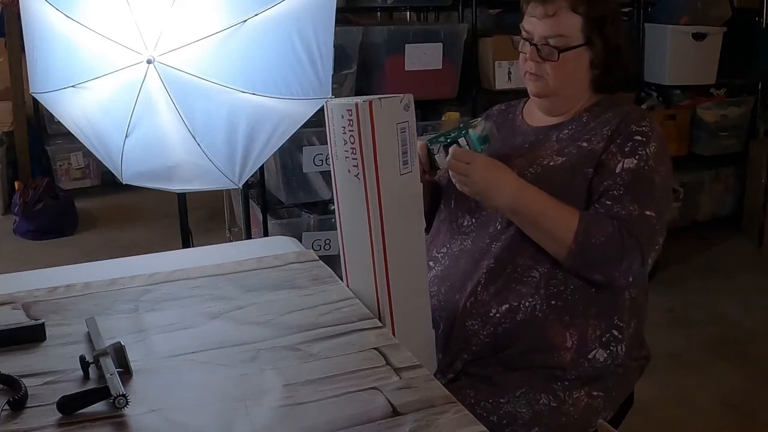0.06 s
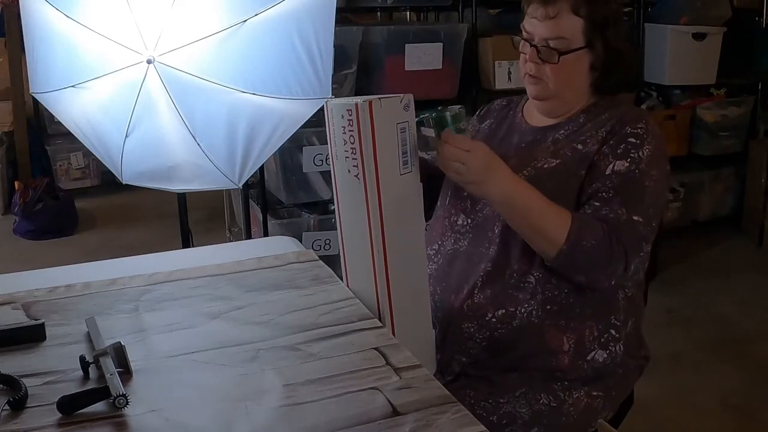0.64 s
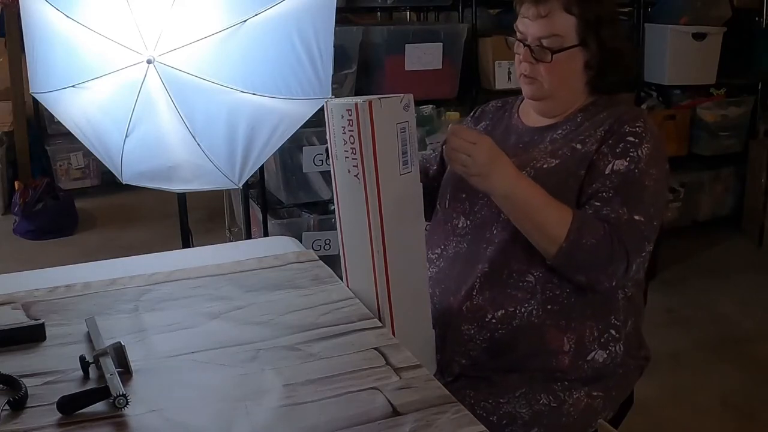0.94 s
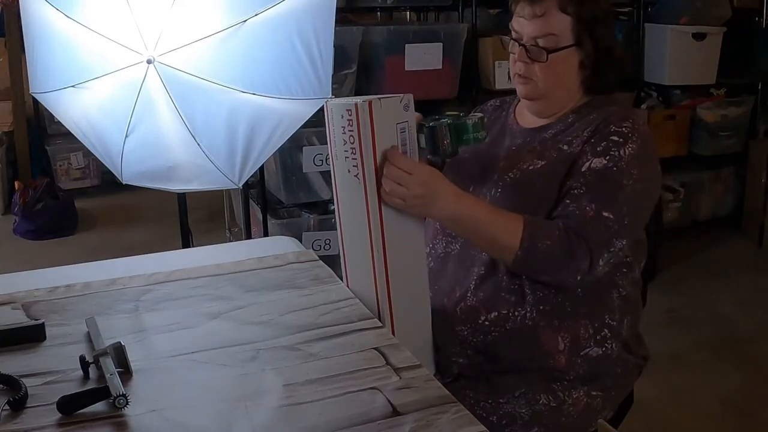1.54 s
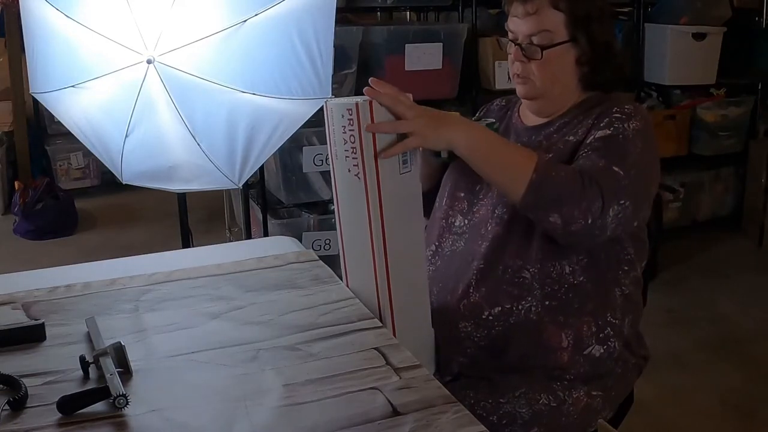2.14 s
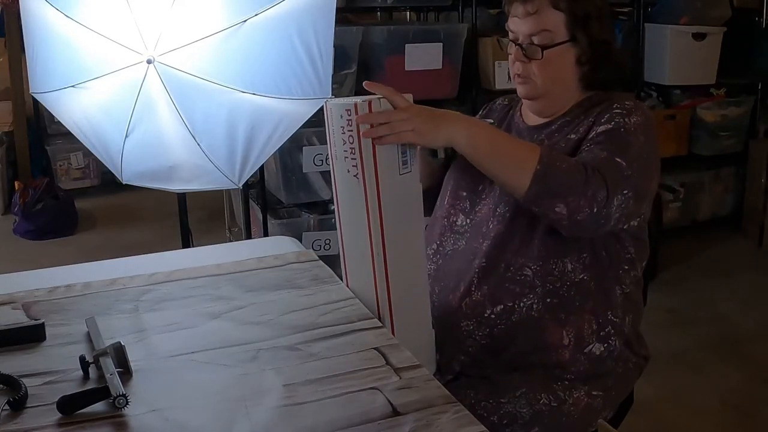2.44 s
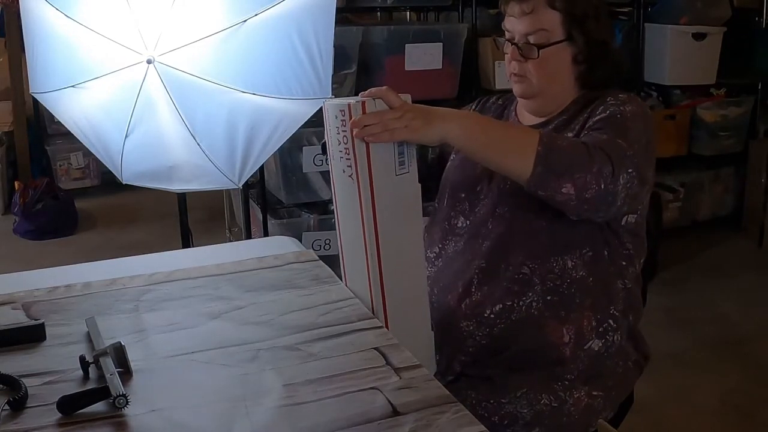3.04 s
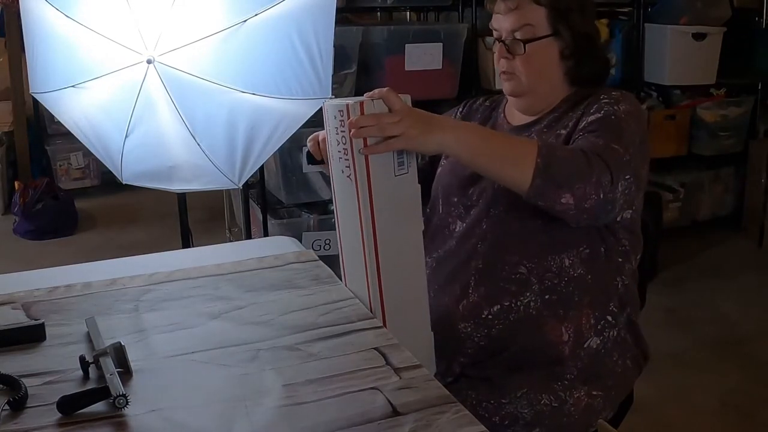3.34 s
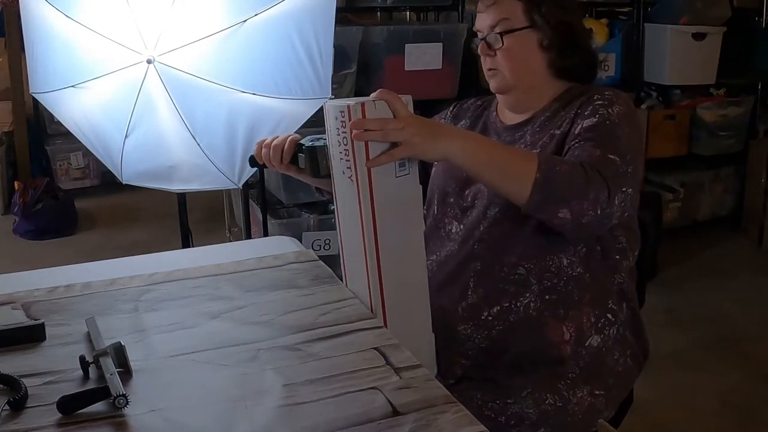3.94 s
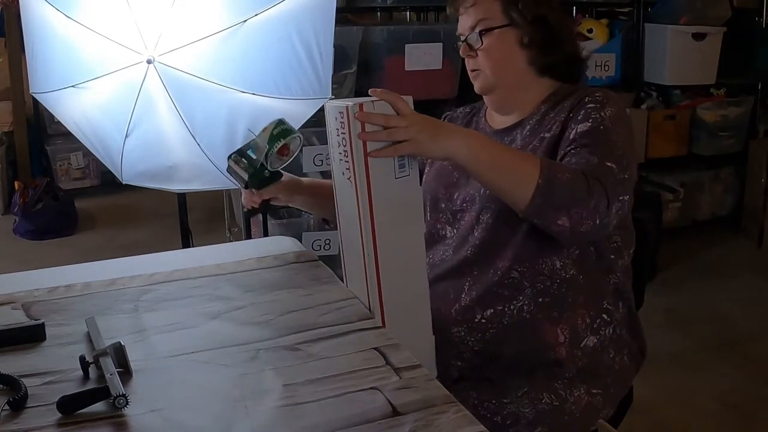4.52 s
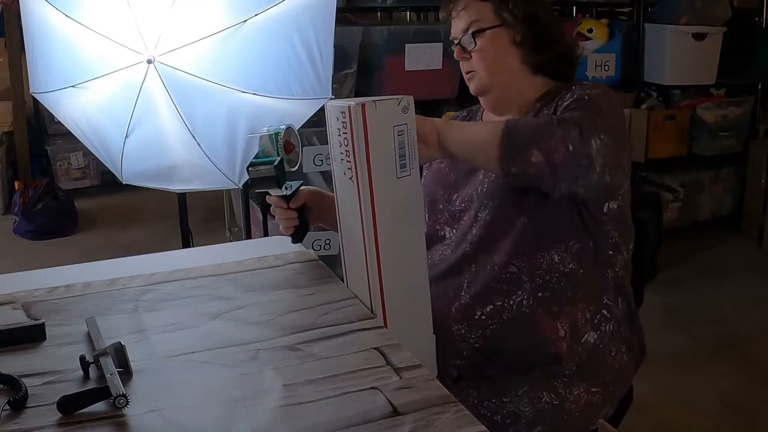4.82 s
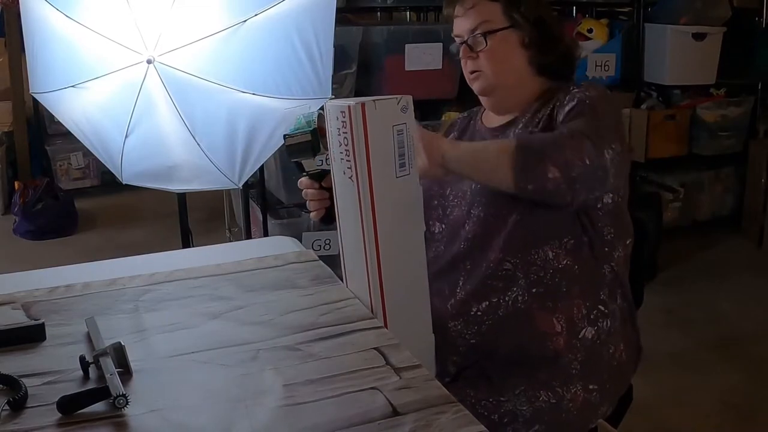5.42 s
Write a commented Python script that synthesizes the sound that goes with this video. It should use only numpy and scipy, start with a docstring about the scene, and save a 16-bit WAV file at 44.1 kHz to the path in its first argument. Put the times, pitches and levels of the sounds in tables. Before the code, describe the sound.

Packing tape jerks off a hand-held gun right at the start, with a tiny rip and then a longer stuttering rasp ending near 0.45 seconds. A faint metallic ring lingers until about 1.2 seconds. From 1.5 to 3.3 seconds a hand softly rubs tape and cardboard, with light bumps and small clicks, and a faint squeak and sharper click near 2.4 seconds. Two more short, loud pulls rasp at 3.4 and 3.9 seconds. Around 4.2 seconds the film snaps sharply on the blade and tears off with a brief crackle. The hollow box knocks and booms between 4.4 and 4.8 seconds, with clicks, a quick scuff and little squeaks on the tape. Soft rubbing continues to about 5.5 seconds. Everything sounds fairly close, in stereo, in a small room with short reflections and a faint low fan drone underneath.

```python
"""Packing tape rasps off a hand-held gun onto a tall cardboard box in a small store room.
Each short pull is a run of stick-slip jerks: the glue cracks loose and the taut film rings.
The blade tears the tape off with sharp snaps and a crackle. In between, metal rings faintly, a hand
rubs and squeaks over the tape, film and gun click, and bumps make the hollow box knock and boom.
A fan drones underneath."""
import sys
import numpy as np
from scipy import signal
from scipy.fft import rfft, irfft, next_fast_len
from scipy.io import wavfile

SR = 44100
rng = np.random.default_rng(int(sys.argv[2]) if len(sys.argv) > 2 else 0)


def to_wav(s):
    """Save 16-bit WAV."""
    ch = np.atleast_2d(s).T  # columns
    pcm = np.round(np.clip(ch, -1, 1) * 32767)  # PCM
    wavfile.write(sys.argv[1], SR, pcm.astype(np.int16))


N = 245989

# Levels in the tables are faders within a layer; the functions add each layer's trim.
# runs of tape jerks, five pulls and then the sharp snaps as the blade starts tearing the film:
#   (first jerk [s], second jerk [s], last jerk [s], jerks [count], slowing [0-1],
#   first jerk [dB], middle jerks [dB], last jerk [dB], fizz against a jerk [dB], bass [dB],
#   treble [dB], ring aimed at first [Hz], ring aimed at last [Hz], tug on the box [dB])
JERK_RUNS = [(.1529, .158, .165, 3, 0, -21, -16, -24.5, -13, -2, 11.5, 4500, 5100, -75),
             (.2887, .3115, .4315, 10, .45, -14.5, -18.3, -25.5, -13.5, 3, 3, 3900, 3600, -66),
             (3.4043, 3.4355, 3.5385, 10, 0, -15, -17.3, -17, -11, -3, .5, 3000, 5000, -35),
             (3.8581, 3.873, 3.9415, 5, .15, -18.5, -16.5, -17, -9.5, -2, 4, 4800, 4000, -40),
             (4.199, 4.2045, 4.214, 3, 0, -22, -15, -14, -15, -7, 2, 4300, 4850, -46),
             (4.262, 4.2675, 4.2815, 3, 0, -29, -19, -21, -12, -3, -9, 3300, 3600, -38)]
# tone of the cracking film: (frequency [Hz], level [dB])
FILM_COLOUR = [(71, -40), (120, -24), (261, -22.5), (370, -7.5), (436, -11.5), (473, -9), (727, -13.5),
               (1860, -1.5), (2240, -1.5), (3660, -3.5), (4060, -5), (4780, -1.5), (5300, -5.5),
               (12000, -26), (16000, -43.5)]
# resonances of film and gun: (frequency [Hz])
FILM_RINGS_HZ = [2320, 3100, 3770, 4750]
# tone of the tearing film: (frequency [Hz], level [dB])
TEAR_COLOUR = [(180, -56.5), (300, -26), (532, 2), (714, -8.5), (1190, 5.5), (1520, -7.5), (2480, 3),
               (3270, -0.5), (3610, -15.5), (4390, -17), (4850, -5.5), (5710, -14.5), (7920, -15),
               (12100, -26.5), (15000, -59)]
# ring of the blade and its plate: (frequency [Hz], t60 [s], level against the tearing [dB])
BLADE_MODES = [(1195, .17, -5), (2550, .05, -10), (3640, .08, -5)]
# metal that sings along: (frequency [Hz], level [dB], t60 [s])
METAL_MODES = [(811, -64.5, 0.92), (1800, -80.5, 1.6), (1810, -78.5, 1.8), (3380, -74.5, 0.99)]
# snaps of film and gun: (time [s], level [dB], bass [dB], treble [dB], ring [Hz])
CLICKS = [(.046, -44, -4.5, -9.5, 4190), (0.1046, -43, -.5, 6.5, 5240), (.111, -45, 0.5, 2, 1900),
          (0.148, -38.5, -11.5, 4, 4863), (1.3622, -57, -4, 17, 5790), (1.558, -36, -3.5, 6.5, 3260),
          (1.566, -43.5, -8.5, -2, 3150), (1.7203, -30, 11.5, 11, 6030), (1.754, -37.5, 8, 6.5, 6500),
          (2.139, -54.5, -6.5, -7, 5600), (2.4163, -29.5, -0.5, 6, 1950), (2.4179, -24.5, -3.5, -14, 3830),
          (2.898, -54, -2, -1, 2750), (3.0829, -42.5, 17, -14, 1030), (3.391, -42, -13, -4, 2200),
          (3.78, -39, -13, -5, 4070), (3.8072, -41.5, 1, 11.5, 2140), (3.8423, -42.5, 4.5, 6, 3200),
          (4.1629, -26.5, -6, 10.5, 5160), (4.1647, -30, -17, -9, 2000), (4.181, -26, -4.5, 9, 5000),
          (4.1876, -33, -4.5, 9.5, 4800), (4.381, -33.5, 11, -8, 3500), (4.403, -31, 20.5, -11, 1930),
          (4.4663, -32.5, -20.5, -5, 2950), (4.5016, -37, 30, -25, 3040), (4.593, -38.5, 25, -25, 1790),
          (4.604, -31.5, 3.5, 0, 2820), (5.023, -55.5, -15.5, 13, 2140)]
# bumps on the box: (time [s], panel knock [dB], hollow boom [dB])
BUMPS = [(1.603, -61.5, -57), (1.724, -51.5, -48.5), (1.758, -56, -46), (3.084, -54.5, -66),
         (3.462, -55, -37.5), (3.61, -59, -55), (4.015, -53.5, -42.5), (4.226, -42, -39.5),
         (4.2619, -43, -45.5), (4.401, -36.5, -61), (4.429, -56, -41.5), (4.503, -53, -31.5),
         (4.522, -44.5, -34.5), (4.593, -45.5, -48), (4.746, -51, -42), (4.845, -68, -49.5)]
# knock of the stiff cardboard panels: (frequency [Hz], level [dB], t60 [s])
PANEL_MODES = [(264, 0, 0.081), (366, 1.5, 0.16), (363, 7.5, 0.027), (454, 0.5, 0.073), (507, 6.5, 0.009),
               (650, -0.5, 0.055), (743, -6.5, 0.22), (1000, 6.5, 0.014), (1146, 1.5, 0.11),
               (1334, -3, 0.17)]
# boom of the air and big faces of the box: (frequency [Hz], level [dB], t60 [s])
HOLLOW_MODES = [(46.4, -5, 0.6), (91.7, -3, 0.38), (128.9, -2, 0.3), (157.6, -5.5, 0.17),
                (211.5, -3, 0.078)]
# hand strokes: (full pressure [s], hold [s], attack [dB/s], cardboard rub [dB], film hiss [dB])
STROKES = [(.01, 0.059, 300, -67.5, -60), (.62, 0.15, 100, -74, -72.5), (0.881, .04, 60, -77, -69),
           (1.558, 0.016, 399.5, -69.5, -51), (1.71, 0.041, 250, -58.5, -52.5),
           (2.09, 0.023, 600, -56, -59), (2.38, 0.053, 104, -55.5, -51.5), (2.492, 0.045, 200, -72, -58.5),
           (2.688, 0.024, 98, -64.5, -65.5), (2.94, 0.1, 115, -64, -64.5), (3.092, 0.11, 697, -52.5, -61),
           (3.154, 0.0091, 1200, -56, -47), (3.22, 0.36, 98.5, -52, -58), (3.7, 0.67, 99.5, -65.5, -67.5),
           (4.516, 0.002, 1100, -31.5, -40.5), (4.685, .03, 200, -76, -51.5),
           (4.749, 0.017, 250, -62, -43.5), (5.024, 0.037, 400, -75, -63), (5.186, 0.019, 99, -57.5, -56.5),
           (5.322, 0.21, 195.5, -61.5, -65)]
# tone of skin on cardboard: (frequency [Hz], level [dB])
RUB_COLOUR = [(210, -41.5), (350, -4.5), (495, -15.5), (791, -12.5), (1180, -2), (1550, -7), (1940, -3.5),
              (2310, -14), (3580, -13.5), (4000, -15.5), (5200, -53.5), (8800, -120)]
# tone of skin on film: (frequency [Hz], level [dB])
HISS_COLOUR = [(1500, -27.5), (2100, 4.5), (2600, 2.5), (3500, 5), (6500, -3), (9000, -11), (13000, -18.5),
               (16000, -41)]
# narrow singing tones, a faint metal ring after the first pulls and then short squeaks on the film:
#   (time [s], length [s], level [dB], pitch [Hz])
SINGING_TONES = [(0.549, 0.66, -73.5, 1792), (2.328, 0.082, -56, 2040), (4.642, 0.017, -53.5, 2010),
                 (4.712, 0.08, -52, 1900)]
# reverb decay: (frequency [Hz], t60 [s])
ROOM_T60 = [(100, 1), (400, 0.24), (1000, .37), (2500, 0.33), (5000, 0.31), (8000, 0.2), (14000, 0.24)]
# reverb tone: (frequency [Hz], level [dB])
ROOM_COLOUR = [(100, -9.5), (500, 4.5), (1500, -1), (3000, -4), (5000, -6), (8000, -3), (14000, -4)]
# room tone: (frequency [Hz], level [dB])
AIR_COLOUR = [(15, -48), (25, -18), (43, 0.5), (64, -3.5), (87, -21.5), (166, -6.5), (285, -19.5),
              (363, -19.5), (796, -32), (988, -27), (1260, -28.5), (1480, -25.5), (2110, -40),
              (4870, -36.5), (16000, -62)]
# fan drone: (frequency [Hz], level [dB])
FAN_TONES = [(53, -70), (118, -77.5), (208, -71)]
# stereo width: (frequency [Hz], left-right correlation [0-1])
CORRELATION = [(100, 0.51), (500, 0.77), (1500, 0.71), (3000, 0.62), (4500, 0.46), (6000, 0.84),
               (12000, 0.058)]
# resonance of the microphone ports: (frequency [Hz], level [dB])
PORT_COLOUR = [(10, -3.5), (6000, -2.5), (7400, 2.5), (8500, -1.5), (10500, -3.5), (20000, -2.5)]
# stereo balance: (frequency [Hz], left minus right [dB])
BALANCE = [(100, 0), (1000, 0), (2500, 3), (4000, 3), (5500, 1.5), (7300, 2.5), (8700, -5), (10300, -0.5),
           (14000, -3.5)]

JERK_S, SLIP_SHARE, FIZZ_S = .0085, .72, .018   # longest slip; slip's share of a gap; fizz decay time
TENSION_DB = 2.2   # a middle jerk gains this much after sticking twice as long
JERK_SPREAD_DB, TREBLE_SPREAD_DB, RING_SPREAD = 1.0, 2.5, .15   # middle jerks vary; ring in log pitch
JITTER = .09   # uneven timing: share of the mean gap between jerks


def tape_jerks(size=3072):
    """Each jerk is a swell of cracks and a fizz: glue giving way in a pull, film snapping on the blade."""
    out, t = np.zeros((2, N)), np.arange(size) / SR
    for run in JERK_RUNS:
        *timing, first_db, middle_db, last_db, fizz_db, bass_db, treble_db, first_hz, last_hz, _ = run
        fizz = from_db(fizz_db) * np.exp(-t / FIZZ_S)
        times = jerk_times(*timing)
        gaps = np.diff(times)
        lengths = np.clip(SLIP_SHARE * np.append(gaps, gaps[-1]), 1 / SR, JERK_S)
        chance = np.pad(rng.standard_normal((len(times) - 2, 3)), ((1, 1), (0, 0)))
        stuck = np.log2(gaps[:-1])
        tension_db = TENSION_DB * (stuck - stuck.mean())
        levels = np.hstack([first_db, middle_db + tension_db, last_db]) + JERK_SPREAD_DB * chance[:, 0]
        trebles = treble_db + TREBLE_SPREAD_DB * chance[:, 1]
        # the ring shifts as the free film changes length
        rings = np.geomspace(first_hz, last_hz, len(times)) * np.exp(RING_SPREAD * chance[:, 2])
        for s, length, level_db, bright_db, hz in zip(times, lengths, levels, trebles, rings):
            attack = np.clip(t / (.3 * length), 0, 1) ** .7
            release = np.exp(-np.maximum(t - .75 * length, 0) / .0011)
            cracks = grains(size, per_s=16000, spread_db=1.2) * (attack * release + fizz)
            jerk = film(cracks, bass_db, bright_db, nearest_ring(hz), ring_db=4, width_hz=380)
            add(out, s, from_db(level_db - 0.45) * rms_one(jerk) * np.sqrt(length * SR / size))
    return out


def jerk_times(first_s, second_s, last_s, jerks, slowing):
    """The tape gives, catches once, then stutters in jerks that spread out if the hand slows."""
    progress = np.linspace(0, 1, round(jerks) - 1)
    progress[1:-1] += JITTER * progress[1] * rng.standard_normal(len(progress) - 2)
    slowed = progress - slowing * progress * (1 - progress)
    return np.append(first_s, second_s + (last_s - second_s) * slowed)


def nearest_ring(hz):
    """The resonance of film and gun that lies closest to hz."""
    return min(FILM_RINGS_HZ, key=lambda ring_hz: abs(np.log(ring_hz / hz)))


def film(cracks, bass_db, treble_db, ring_hz, ring_db, width_hz):
    """Cracks radiate from the taut film, whose free length and tension set its ring and brightness."""
    tilt = [(700, bass_db), (1800, 0.011), (4800, 0.0028), (7000, treble_db)]
    sound = colour(cracks, [(hz, db + at_hz(tilt, hz)) for hz, db in FILM_COLOUR], size=1024)
    return sound + from_db(ring_db) * resonance(sound, ring_hz, width_hz)


def tear(level_db=-31):
    """The teeth of the blade split the film in a dense crackle, which sets the blade ringing."""
    bite = swell(4.258, hold_s=0.044, rise_db_per_s=600, fall_db_per_s=230)
    crackle = from_db(level_db) * bite * grains(N, per_s=7000, spread_db=2.2)
    rip = rms_one(colour(crackle, TEAR_COLOUR))
    blade = sum(from_db(db) * rms_one(ring(crackle, hz, t60)) for hz, t60, db in BLADE_MODES)
    return np.std(crackle) * (rip + blade)


def metal(tape, trim_db=-15):
    """Metal rings faintly in sympathy with the tape."""
    return sum(from_db(db + trim_db) * ring(tape, hz, t60) for hz, db, t60 in METAL_MODES)


def clicks(trim_db=-7.5, size=2048):
    """A crease or a loose part of the gun snaps over within a few milliseconds."""
    out, t = np.zeros((2, N)), np.arange(size) / SR
    envelope = np.clip(t / .0009, 0, 1) * np.exp(-np.maximum(t - .002, 0) / .0012)
    for s, level_db, bass_db, treble_db, ring_hz in CLICKS:
        snap = film(diffuse(size) * envelope, bass_db, treble_db, ring_hz, ring_db=7, width_hz=600)
        add(out, s, from_db(level_db + trim_db) * rms_one(snap))
    return out


def box(size=1024):
    """Each bump is a scuff that knocks the panels and a push that booms in the hollow."""
    out, t = np.zeros(N), np.arange(size) / SR
    scuffs, pushes = np.zeros(N), np.zeros(N)
    push = np.diff(-np.exp(-t / 0.00039))
    # the tape tugs as each run of jerks starts and stops, with the knock turned down against the boom
    tugs = [(s, db - 8, db) for first_s, _, last_s, *_, db in JERK_RUNS for s in (first_s, last_s)]
    for s, knock_db, boom_db in BUMPS + tugs:
        scuff = rms_one(rng.standard_normal(size) * np.exp(-t / 0.0055)) / np.sqrt(size)
        add(scuffs, s, from_db(knock_db + 3.5) * scuff)
        add(pushes, s, from_db(boom_db + 2.0) * push)
    for drive, modes in ((scuffs, PANEL_MODES), (pushes, HOLLOW_MODES)):
        for k, (hz, level_db, t60) in enumerate(modes):
            out += (-1) ** k * from_db(level_db) * ring(drive, hz, t60)
    return out


def hand(rub_trim_db=-4, hiss_trim_db=-3.5):
    """Skin catches on paper fibres and, more brightly, on the film, where small creases give way."""
    rub, hiss = from_db(-78.5), from_db(-77)   # the hand never lies quite still
    for s, hold_s, rise_db_per_s, rub_db, hiss_db in STROKES:
        pressure = swell(s, hold_s, rise_db_per_s, fall_db_per_s=380)
        rub = np.maximum(rub, from_db(rub_db) * pressure)
        hiss = np.maximum(hiss, from_db(hiss_db) * pressure)
    paper = rub * rms_one(colour(grains(N, per_s=6300, spread_db=6.0), RUB_COLOUR))
    catches = grains(N, per_s=5700, spread_db=3.0)
    crinkles = from_db(-12) * grains(N, per_s=40, spread_db=5)
    tape = hiss * rms_one(colour(catches + crinkles, HISS_COLOUR))
    return from_db(rub_trim_db) * paper + from_db(hiss_trim_db) * tape


def singing_tones():
    """Narrow bands of noise swell and fade: a lingering metal ring, then short friction squeaks."""
    out = np.zeros(N)
    for s, length, level_db, hz in SINGING_TONES:
        song = rms_one(resonance(rng.standard_normal(SR), hz, width_hz=180))[:int(length * SR)]
        add(out, s, from_db(level_db) * song * np.sqrt(np.hanning(len(song))))
    return out


def room(send, size=32768):
    """Stereo reflections from table and shelves, fed by the left channel and dying band by band."""
    t, noise, tail = np.arange(size) / SR, rfft(diffuse(size)), 0
    octave = np.log2(np.maximum(np.arange(size // 2 + 1) * SR / size, 1))
    centres = np.geomspace(100, 14000, 12)
    onset = np.clip((t - .002) / 0.0024, 0, 1)
    early_lift = 1 + np.exp(-t / 0.014)
    for hz, weights in zip(centres, np.eye(len(centres))):
        band = irfft(noise * np.interp(octave, np.log2(centres), weights))
        fade = np.exp(-np.log(1000) * t / at_hz(ROOM_T60, hz)) * early_lift * onset
        tail = tail + from_db(at_hz(ROOM_COLOUR, hz)) * band * fade / np.sqrt(np.sum(fade ** 2))
    return signal.fftconvolve(send[:1], tail, axes=1)[:, :N]


def background():
    """A bed of still room air and the unsteady drone of a fan."""
    air = from_db(-60) * rms_one(colour(diffuse(N), AIR_COLOUR))
    drone = sum(from_db(db) * rms_one(resonance(rng.standard_normal(N), hz, width_hz=0.034 * hz))
                for hz, db in FAN_TONES)
    low_cut = signal.butter(6, 44, "high", fs=SR, output="sos")
    return signal.sosfilt(low_cut, air + drone)


def grains(n, per_s, spread_db):
    """Tiny random fractures of uneven size, each radiating its own way; stereo, rms 1."""
    sizes = from_db(spread_db * np.minimum(rng.exponential(1, n), 4))
    fires = rng.random(n) < per_s / SR
    return rms_one(stereo_image(sizes * fires * rng.choice([-1, 1], (2, n))))


def diffuse(n):
    """Stereo white noise arriving from all sides."""
    return stereo_image(rng.standard_normal((2, n)))


def stereo_image(pair):
    """Blend two unrelated signals into a close stereo pair, widest in the top treble."""
    n = next_fast_len(pair.shape[-1], True)
    mid, side = rfft(pair, n)
    alike = np.clip(at_hz(CORRELATION, np.arange(len(mid)) * SR / n), -1, 1)
    left_right = np.sqrt((1 + alike) / 2) * mid + np.sqrt((1 - alike) / 2) * side * [[1], [-1]]
    return irfft(left_right, n)[:, :pair.shape[-1]]


def swell(s, hold_s, rise_db_per_s, fall_db_per_s):
    """Gain that rises to 1 at time s, holds and falls away."""
    t = np.arange(N) / SR - s
    down_db = rise_db_per_s * np.maximum(-t, 0) + fall_db_per_s * np.maximum(t - hold_s, 0)
    return from_db(-np.minimum(down_db, 200))


def colour(x, spectrum, size=4096):
    """Minimum-phase EQ with the given curve, rolling off 18 dB an octave outside it."""
    hz = np.maximum(np.arange(size // 2 + 1) * SR / size, 1)
    outside = np.maximum(np.log2(spectrum[0][0] / hz), 0) + np.maximum(np.log2(hz / spectrum[-1][0]), 0)
    cepstrum = irfft(np.log(from_db(at_hz(spectrum, hz) - 18 * np.minimum(outside, 4))))
    cepstrum[1:size // 2] *= 2
    cepstrum[size // 2 + 1:] = 0
    response = irfft(np.exp(rfft(cepstrum)))
    return signal.fftconvolve(x, np.array(response, ndmin=x.ndim), axes=-1)[..., :x.shape[-1]]


def resonance(x, hz, width_hz):
    """Two-pole band-pass with gain 1 at its peak."""
    r, w = np.exp(-np.pi * width_hz / SR), 2 * np.pi * hz / SR
    return signal.lfilter(np.array([1, 0, -1]) * (1 - r * r) / 2, [1, -2 * r * np.cos(w), r * r], x)


def ring(x, hz, t60):
    """A unit click sets a sine of height 1 ringing."""
    r, w = np.exp(-np.log(1000) / (t60 * SR)), 2 * np.pi * hz / SR
    return signal.lfilter([0, np.sin(w)], [1, -2 * r * np.cos(w), r * r], x + 1e-18)


def from_db(db):
    """Decibels to gain."""
    return 10 ** (np.asarray(db) / 20)


def rms_one(x):
    """Scale to rms 1."""
    return x / np.sqrt(np.mean(x ** 2) + 1e-20)


def at_hz(points, hz):
    """Read a table on a log-frequency axis."""
    return np.interp(np.log(np.maximum(hz, 1)), np.log(np.array(points)[:, 0]), np.array(points)[:, 1])


def add(track, s, sound):
    """Mix a sound in at time s."""
    at = max(round(s * SR), 0)
    track[..., at:at + sound.shape[-1]] += sound[..., :N - at]


def scene():
    """Tape, gun, box and hand in the room; the snaps sit drier than the rest of the action."""
    tape = tape_jerks() + tear()
    snaps = clicks()
    action = tape + metal(tape) + box() + hand() + singing_tones()
    return action + snaps + room(action + from_db(-3.5) * snaps) + background()


def record(dry):
    """The left microphone hears one sample later, the two differ in colour, and the top is cut."""
    late_left = np.concatenate([[0], dry[0, :-1]])
    ports = colour(np.array([late_left, dry[1]]), PORT_COLOUR)
    heard = [colour(x, [(10, 0.0027)] + [(hz, sign * db / 2) for hz, db in BALANCE] + [(SR / 2, 0)])
             for x, sign in zip(ports, (1, -1))]
    high_cut = signal.ellip(10, .1, 80, 15900, fs=SR, output="sos")
    return signal.sosfilt(high_cut, heard)


dry = scene()
out = record(dry)
to_wav(out)
```